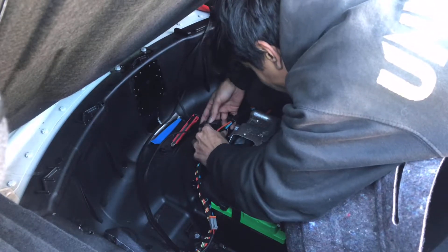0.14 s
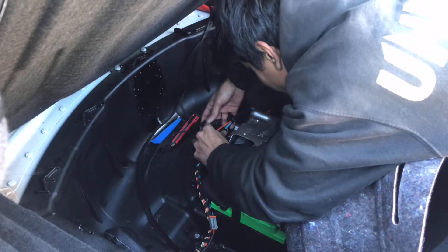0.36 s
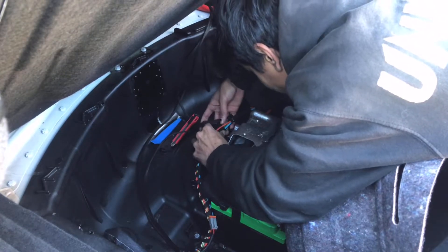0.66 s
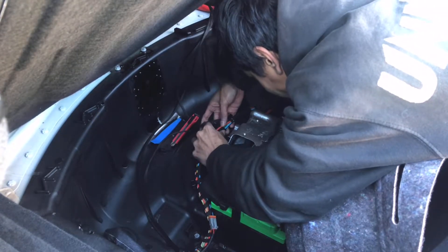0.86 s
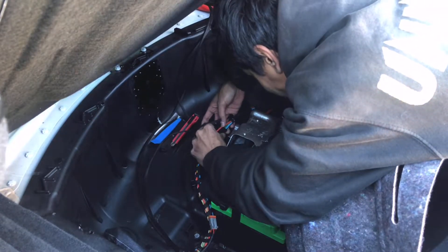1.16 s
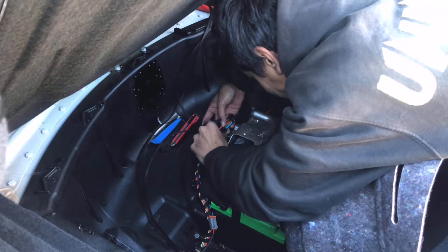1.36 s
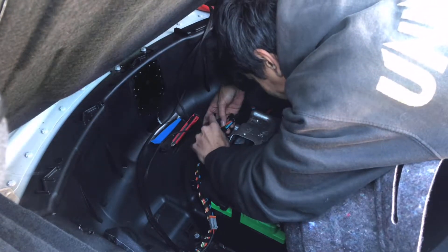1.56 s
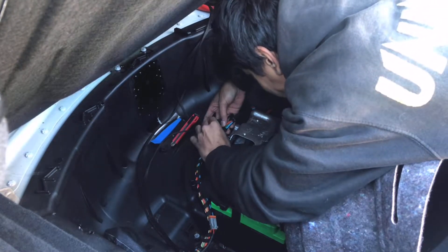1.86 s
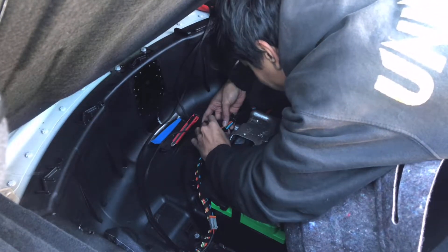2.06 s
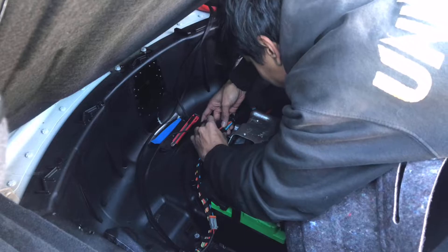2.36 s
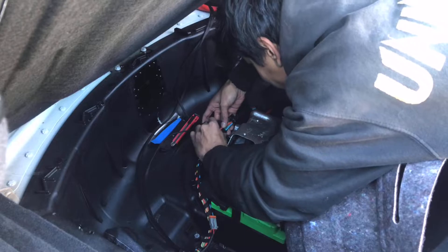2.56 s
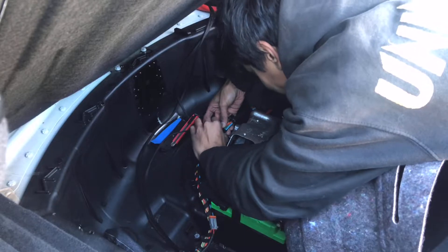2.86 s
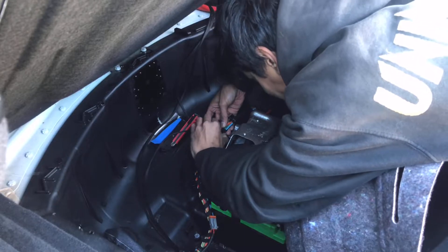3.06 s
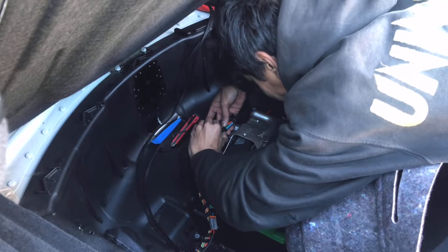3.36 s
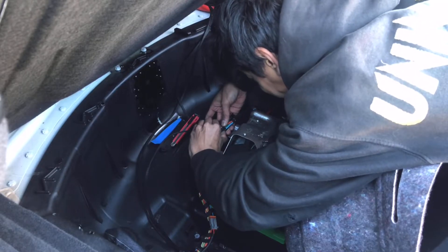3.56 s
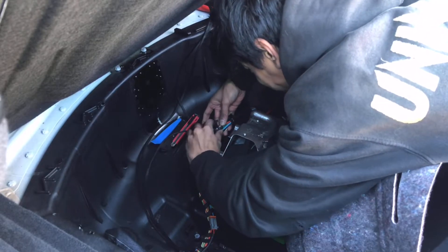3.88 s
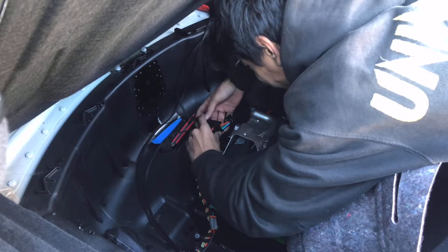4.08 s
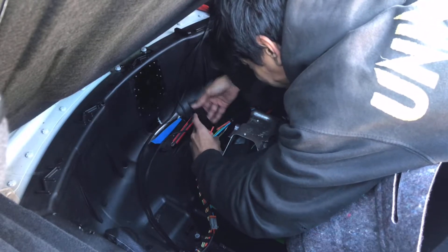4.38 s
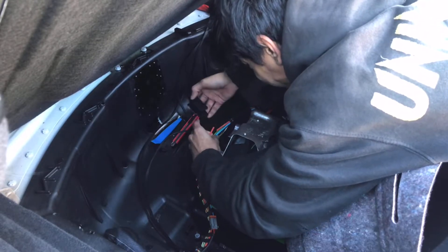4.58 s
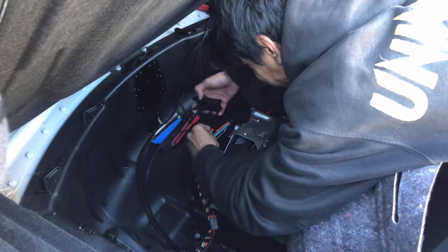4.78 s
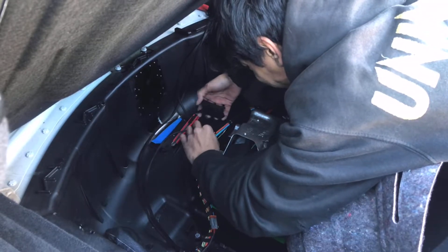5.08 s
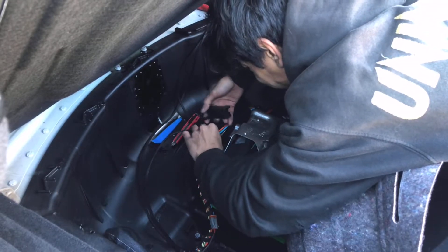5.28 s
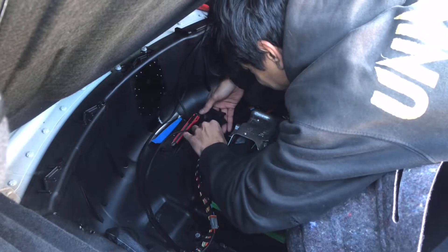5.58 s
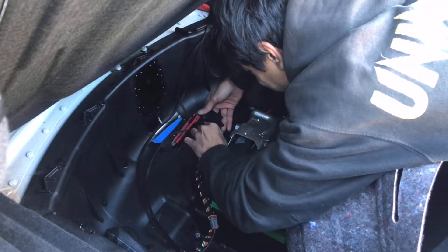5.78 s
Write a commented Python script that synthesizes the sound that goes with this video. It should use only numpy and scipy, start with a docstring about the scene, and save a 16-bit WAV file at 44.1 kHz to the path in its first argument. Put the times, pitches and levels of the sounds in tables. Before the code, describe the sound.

The first seconds are mostly outdoor traffic heard from an open car trunk: a vehicle already approaching swells to its nearest at about 1.1 s, a dull roar with low engine hum and faint tyre singing, its pitch sinking slightly as it fades away by around 3 s. Faint deep thumps begin at 1.4 s, with handling rumble from 2.3 s. A thin leak rises just before 3.36 s, when the cut line releases with a crisp, very short pop. Bright compressed air then hisses without stopping to the end at about 6 s. It starts strongest, narrow and sharp, eases, then grows fuller and more hollow as the grip changes, with breathy half-whistles, a sharp spit at 4.33 s and brief dips and returns around 5.1 to 5.6 s. Dull knocks and uneven rubbing cluster from 3.7 to 4.7 s and again near 5.5 s, close to the microphone.

```python
"""Outside an open car trunk, a vehicle swells and fades: roar shaped by distance, engine lines, tyre song.
Handling adds damped low thumps and a lumpy rumble at the microphone. A cut suspension line leaks,
then lets go with a pop of short noise bursts. Compressed air hisses out as turbulent noise that changes
colour with the grip, half whistling in narrow resonances as fingers work the tube."""
import sys
import numpy as np
from scipy import signal
from scipy.fft import rfft, irfft
from scipy.io import wavfile
from scipy.ndimage import uniform_filter1d

SR = 44100
rng = np.random.default_rng(int(sys.argv[2]) if len(sys.argv) > 2 else 0)


def bounce(signal):
    """Save signal as a 16-bit WAV file at the path given by the first command-line argument."""
    frames = np.transpose(np.atleast_2d(signal))
    limited = np.clip(frames, -1, 1)
    pcm = np.round(limited * 32767).astype(np.int16)
    wavfile.write(sys.argv[1], SR, pcm)


N = 261513
TIME = np.arange(N) / SR
BIN_HZ = np.fft.rfftfreq(1024, 1 / SR)
FRAME_S = np.arange(N // 256 + 5) * 256 / SR

# Vehicle roar, relative spectrum at its nearest: frequency_hz, density_db (per Hz)
ROAR_SPECTRUM = [(15, -35), (25, 0.5), (53, -1.5), (108, -9), (130, -8.5), (200, 2.5), (277, -8.5),
                 (394, -2.5), (476, -10.5), (607, -5.5), (1160, -10.5), (1440, -14.5), (4490, -24),
                 (11000, -37), (16000, -57)]
# Dull street background, relative spectrum: frequency_hz, density_db (per Hz)
STREET_SPECTRUM = [(30, -8), (110, -10), (300, -5.5), (700, -4.5), (1300, -4), (2000, -3.5), (2800, -16),
                   (5000, -19), (7500, -30.5), (11000, -40), (14000, -70)]
# Tyres singing as the vehicle comes and goes: start_s, end_s, pitch_hz, width_hz, level_db
TYRE_SONG = [(-.2, 0.87, 1923, 70, -48.5), (-.2, 1.2, 1800, 300, -50.5), (-.2, 0.82, 2130, 200, -53.5),
             (-.2, .55, 1070, 170, -61), (1.3, 2.2, 1900, 160, -55), (1.2, 3.6, 1150, 380, -49)]
# Engine lines, each reaching the trunk best from its own angle:
# pitch_hz (at the nearest point), level_db, loudest_s, lasting_s (to 1/e on either side)
ENGINE_LINES = [(64.6, -42, 0.82, 1.3), (105.9, -40.5, 0.78, 1.9), (210, -37.5, 1.78, 0.51),
                (242, -40, 0.93, 0.24), (320.2, -41, 1.13, 0.97), (398, -42.5, 1.47, 0.96),
                (576, -49, 1.27, 1.3), (670, -46.5, 0.82, 0.88), (1070, -47.5, 1.44, 0.28)]
NEAREST_S = 1.082  # when the vehicle is nearest
PASS_S = 1.203  # time it takes to travel as far as its nearest distance
FALL_DB = 60  # treble loss per tenfold distance
# from this time on, while the vehicle is still approaching, the treble tilt grows (dB per octave each second)
DULL_FROM_S, DULL_DB_PER_S = 0.59, 1.2
DOPPLER_SHARE = 0.035  # vehicle speed over the speed of sound

# Handling thumps: start_s, peak_db (before a common trim), pitch_hz, t60_s
THUMPS = [(1.385, -27.5, 42, 0.3), (1.933, -27, 47.5, 0.15), (2.381, -17, 53, 0.067),
          (2.66, -29.5, 170, 0.092), (2.991, -20.5, 76, 0.036), (3.3603, -15.5, 388, 0.01),
          (3.363, -18, 71.5, 0.071), (3.732, -31.5, 315, 0.028), (3.779, -15.5, 62, 0.1),
          (3.83, -26, 278.4, 0.023), (3.84, -16.5, 41, 0.2), (3.936, -21.5, 147, 0.048),
          (3.995, -26, 146, 0.067), (4.178, -28.5, 322, 0.033), (4.258, -15.5, 247.6, 0.019),
          (4.26, -22.5, 627, 0.011), (4.336, -14, 300, 0.014), (4.343, -14, 57.6, 0.072),
          (4.403, -21, 250, .03), (4.448, -24.5, 260, 0.032), (4.585, -26, 167, 0.039),
          (4.732, -29, 222, 0.036), (4.966, -19, 56, 0.056), (5.015, -30.5, 166, 0.04),
          (5.474, -17.5, 185, 0.028), (5.553, -27.5, 248, 0.035), (5.601, -15.5, 42, 0.095)]
# Bouts of handling: start_s, end_s, rumble_db, rub_db (each before a common trim)
HANDLING = [(2.325, 3.38, -34.5, -60), (3.726, 3.88, -23.5, -42), (3.967, 4.72, -29.5, -45.5),
            (4.196, 4.42, -28, -32.5), (4.916, 5.95, -33, -58), (5.406, 5.68, -31.5, -43.5)]
# Handling noise, relative spectrum: frequency_hz, density_db (per Hz)
RUMBLE_SPECTRUM = [(12, -36), (20, -14.5), (38, 5.5), (60, -0.5), (108, -6), (144, -8), (183, -12.5),
                   (268, -19.5), (381, -23), (500, -23.5), (620, -31.5), (900, -41.5), (1170, -62),
                   (1980, -120)]
PRESS_S = 0.032  # build-up of a bout
SETTLE_DB_PER_S, RUB_STOP_DB_PER_S = 96, 260  # the rub stops sooner than the rumble

# Sharp spurts and ticks at the tube: start_s, level_db, length_s (to 1/e), centre_hz, spread_octaves
SPURTS = [(2.9423, -59, 0.0021, 10600, 0.5), (3.3575, -20, 0.0016, 2500, 0.9),
          (3.3585, -9, 0.0025, 9500, 0.22), (3.3597, -11.5, 0.0029, 4200, 1.2),
          (3.426, -32, 0.0043, 1500, 0.21), (4.3302, -19, 0.0077, 7000, 1.23),
          (4.331, -21.5, 0.0063, 5550, 0.034)]
# Air seeping out before the line lets go: time_s, level_db
LEAK_LEVEL = [(3.26, -75), (3.29, -55), (3.355, -40)]
# Leaking air, relative spectrum: frequency_hz, density_db (per Hz)
LEAK_SPECTRUM = [(1500, -28), (3500, -16), (6500, -7), (7200, -7), (7570, 5), (7950, -11), (11500, -18),
                 (12500, -26), (16000, -43)]
RELEASE_S = 3.359  # when the line lets go

# Jet through a narrow slit, relative spectrum: frequency_hz, density_db (per Hz)
SLIT_SPECTRUM = [(530, -62), (900, -37), (1040, -36), (1130, -18), (1510, -21), (1680, -14.5), (1850, -21),
                 (2040, -17), (3040, -6.5), (4920, -7.5), (5750, -1.5), (7060, 0.5), (8250, -9),
                 (11600, -5), (16000, -24)]
# Jet with the cut gaping, relative spectrum: frequency_hz, density_db (per Hz)
OPEN_SPECTRUM = [(530, -25), (900, -22), (1170, -15), (1320, -25), (1390, -21.5), (1790, -18.5),
                 (1920, -18), (2660, -2.5), (3550, -8.5), (3820, -10), (5410, 0), (6720, -0.5), (8660, 0.5),
                 (11700, -4), (16000, -21)]
# Jet with a hand cupped round it, relative spectrum: frequency_hz, density_db (per Hz)
CUPPED_SPECTRUM = [(530, -31), (900, -26), (1040, -20), (1250, -42), (1370, -18), (1660, -25), (2040, -2),
                   (2250, -13.5), (2660, -7.5), (4360, -8), (5610, 1), (6640, -1), (9090, 1), (13200, -6),
                   (16000, -24)]
# Shape of the cut: time_s, grip (0 slit, 1 gaping, 2 cupped; no unit)
GRIP = [(4.1, 0.12), (4.45, 0.86), (5.3, 1.38), (5.48, 1.45), (5.7, 1.73)]
# Jet strength as fingers cover and free the cut: time_s, hiss_db (before a common trim)
FLOW = [(3.385, -27), (3.771, -31.5), (4.225, -30), (4.31, -33), (4.36, -33), (4.412, -33.5),
        (4.672, -32.5), (4.716, -29.5), (5.072, -28), (5.12, -32.5), (5.168, -28), (5.306, -35),
        (5.41, -34.5), (5.428, -31.5), (5.588, -29.5), (5.636, -32.5), (5.92, -31)]
# One row each for slit, gaping and cupped, against the hiss: hollow_db (low part),
# sizzle_db (top, at the usual flow)
BALANCES = [(-9.5, -4.5), (-3, 1.7), (0.5, -2.5)]
# Peaks and notches of the wheel well round the jet (a cupped hand deepens them):
# centre_hz, width_hz (two standard deviations), gain_db
WHEEL_WELL = [(2400, 200, -0.5), (3600, 130, 2.5), (4130, 480, -1.5), (4550, 180, 2), (6660, 420, -3),
              (7160, 140, -3.5), (7790, 450, -3), (8600, 200, 3), (10100, 200, -1), (11520, 220, 4),
              (12450, 250, 0), (13900, 300, 3)]
USUAL_FLOW_DB, SIZZLE_FOLLOWS = -30, 0.64  # the top sizzle follows the flow only in part

# Half whistles where a fingertip splits the jet: start_s, length_s, pitch_hz, level_db (before a common trim)
WHISTLES = [(3.7, .18, 9000, -39), (3.88, 0.14, 6300, -37), (3.99, 0.33, 5620, -35),
            (4.15, .16, 12000, -43), (4.329, 0.69, 10270, -40.5), (4.69, 0.089, 9500, -33),
            (4.4, 0.82, 2760, -40.5), (4.86, 0.33, 4400, -39), (4.967, 0.27, 9900, -34.5),
            (5.203, .3, 10100, -35.5), (5.399, 0.15, 9700, -33), (5.53, 0.12, 10200, -31.5),
            (5.432, 0.31, 3450, -37.5), (5.42, .58, 2600, -42), (5.801, 0.19, 9300, -34)]
WHISTLE_WIDTH_HZ = 190
SKIRT_FROM_HZ, SKIRT_OCTAVES, SKIRT_DB = 7500, 0.47, -0.5  # broad sizzle round the high whistles only
EDGE_HZ = 15800  # upper band limit


def gain_of(db):
    """Logarithmic level: decibels become an amplitude factor."""
    return 10 ** (np.asarray(db) / 20)


def evened(x):
    """Normalisation by mean power: the rms becomes 1."""
    return x / np.sqrt(np.mean(x ** 2) + 1e-20)


def read(points, hz):
    """Spectral interpolation: dB along a log-frequency axis."""
    f, db = np.transpose(points)
    return np.interp(np.log(hz + 1), np.log(f + 1), db)


def follow(rows, t):
    """Linear interpolation of each column of a time curve at the times t."""
    s, *columns = np.transpose(rows)
    return [np.interp(t, s, c) for c in columns]


def add(mix, s, sound):
    """Superposition at time s of a sound that may already be under way at time zero."""
    start = round(s * SR)
    sound = sound[max(-start, 0):]
    part = mix[max(start, 0):][:len(sound)]
    part += sound[:len(part)]


def above(hz, corner_hz, order=8):
    """Crossover: the share of power passed above the corner."""
    return 1 / (1 + (corner_hz / (hz + 1)) ** order)


def noise(shape):
    """Filtered noise: steady, of rms 1, with the gain shape(Hz)."""
    spectrum = rfft(rng.standard_normal(N))
    return evened(irfft(spectrum * shape(np.fft.rfftfreq(N, 1 / SR)), N))


def moving_noise(power):
    """Short-time synthesis: noise of given power in each frame and bin."""
    z = rng.standard_normal(power.shape) + 1j * rng.standard_normal(power.shape)
    x = signal.istft((z * np.sqrt(power)).T, nperseg=1024, noverlap=768)[1][:N]
    return x * np.sqrt(3 / 2)  # makes up for overlapping independent frames


def band_power(power, lo_hz, hi_hz):
    """Band integration: the power of each frame between two frequencies."""
    band = above(BIN_HZ, lo_hz, order=30) * (1 - above(BIN_HZ, hi_hz, order=30))
    return (power * band).sum(1, keepdims=True)


def patches(size):
    """Local averaging: a random field of rms 1, smoothed over size (frames, bins)."""
    field = rng.standard_normal((len(FRAME_S), len(BIN_HZ)))
    over_time = uniform_filter1d(field, size[0], axis=0)
    return evened(uniform_filter1d(over_time, size[1], axis=1))


def fuzzy_tones(rows):
    """Resonance: noise in narrow bands that swell and sink back."""
    out = np.zeros(N)
    for start, end, hz, width_hz, db in rows:
        size = max(round((end - start) * SR), 512)
        # half amplitude at 0.69 of the width on either side
        off = (np.fft.rfftfreq(size, 1 / SR) - hz) / (0.69 * width_hz)
        tone = evened(irfft(rfft(rng.standard_normal(N)[:size]) / (1 + off ** 2), size))
        add(out, start, gain_of(db) * tone * signal.windows.tukey(size, 0.5))
    return out


def traffic(patchy_db=2.0, bass_share=0.15, near_db=-33.5, street_db=-50):
    """Distance loss: a roar over the street and tyre song, its treble falling most and its bass least."""
    t = FRAME_S[:, None]
    distance_db = -FALL_DB * np.log10(np.hypot(1, (t - NEAREST_S) / PASS_S))
    tilt_db = -DULL_DB_PER_S * np.maximum(t - DULL_FROM_S, 0)
    octaves = np.log2(1 + BIN_HZ / 1800)
    reach = bass_share + (1 - bass_share) * above(BIN_HZ, 133, order=4)  # share of the loss per bin
    field_db = near_db + reach * distance_db + tilt_db * octaves + patchy_db * patches(size=(40, 3))
    power = gain_of(read(ROAR_SPECTRUM, BIN_HZ))[None] ** 2
    roar = moving_noise(power / band_power(power, 197, 2400) * gain_of(field_db) ** 2)
    street = gain_of(street_db) * noise(lambda f: gain_of(read(STREET_SPECTRUM, f)))
    return roar + street + fuzzy_tones(TYRE_SONG)


def engine(throb_db=1.5):
    """Doppler effect: wavering engine lines sink in pitch as the vehicle goes by."""
    since = TIME - NEAREST_S
    pitch = 1 - DOPPLER_SHARE * since / np.hypot(since, PASS_S)
    out = np.zeros(N)
    for hz, db, loudest, lasting in ENGINE_LINES:
        drift = noise(lambda f: 1 - above(f, 7.5))
        turns = np.cumsum(hz * pitch * (1 + 0.004 * drift)) / SR
        swell = np.exp(-((TIME - loudest) / lasting) ** 4)
        throb = gain_of(db + throb_db * drift[::-1])  # the reversed drift wavers the level
        out += swell * throb * np.sin(2 * np.pi * turns)
    return out


def thumps(thump_db=1):
    """Damped oscillation: each knock is a soft push that swings and dies away."""
    out, t = np.zeros(N), np.arange(SR // 2) / SR
    for s, db, hz, t60 in THUMPS:
        push = 1 - np.exp(-t * hz / 0.2)
        swing = np.sin(2 * np.pi * hz * t) * push * gain_of(-60 * t / t60)
        add(out, s, -gain_of(db + thump_db) * swing / abs(swing).max())
    return out


def bout(start, end, fall_db_per_s):
    """Envelope of one handling bout: linear growth, a hold, then exponential decay."""
    return np.clip((TIME - start) / PRESS_S, 0, 1) * gain_of(-fall_db_per_s * np.maximum(TIME - end, 0))


def rumble(rumble_db=-1, rub_db=-1, lumpy_db=3):
    """Frictional noise: deep handling rumble, with an uneven rub on top when the grip slips."""
    weight = sum(gain_of(db) * bout(start, end, SETTLE_DB_PER_S) for start, end, db, _ in HANDLING)
    slip = sum(gain_of(db) * bout(start, end, RUB_STOP_DB_PER_S) for start, end, _, db in HANDLING)
    deep = noise(lambda f: gain_of(read(RUMBLE_SPECTRUM, f)) * np.sqrt(1 - above(f, 146)))
    # level out chance swells, so that the hands set them
    deep = deep / np.sqrt(uniform_filter1d(deep ** 2, size=2500) + 0.023)
    rub = noise(lambda f: gain_of(read(RUMBLE_SPECTRUM, f)) * np.sqrt(above(f, 130)))
    lumps = noise(lambda f: 1 - above(f, 50))
    rub = evened(rub * gain_of(lumpy_db * lumps))
    return gain_of(rumble_db) * weight * deep + gain_of(rub_db) * slip * rub


def spurts(tail_db=-20, tail_t60=0.099, top_hz=12000, rise_s=0.00025):
    """Impulsive release: milliseconds of air at full pressure, then the short ring of the trunk."""
    out, t = np.zeros(N), np.arange(8192) / SR
    f = np.fft.rfftfreq(len(t), 1 / SR) + 1
    for s, db, length, hz, spread in SPURTS:
        band = np.exp(-0.5 * (np.log2(f / hz) / spread) ** 2)
        colour = band * np.sqrt(1 - above(f, top_hz, order=20))
        air = evened(irfft(rfft(rng.standard_normal(len(t))) * colour))
        ring = gain_of(tail_db - 60 * t / tail_t60)
        shape = (1 - np.exp(-t / rise_s)) * (np.exp(-(t / length) ** 4) + ring)
        add(out, s, gain_of(db) * air * shape)
    return out


def leak():
    """Flow noise through a small gap: a thin whistling hiss grows as the seal gives."""
    level_db, = follow(LEAK_LEVEL, TIME)
    hiss = noise(lambda f: gain_of(read(LEAK_SPECTRUM, f)))
    return (TIME > LEAK_LEVEL[0][0]) * gain_of(level_db) * hiss


def jet(patchy_db=2.03, sputter_db=0.55, jet_db=-0.74, breadth_db=-24, cupping=0.44):
    """Turbulence: jet noise coloured by the cut and rippled by reflections from hands and trunk."""
    level_db, = follow(FLOW, FRAME_S[:, None])
    grip = np.clip(follow(GRIP, FRAME_S[:, None])[0], 0, 2)
    hollow_db, sizzle_db = (np.interp(grip, range(len(BALANCES)), c) for c in np.transpose(BALANCES))
    sizzle_db = sizzle_db - (1 - SIZZLE_FOLLOWS) * (level_db - USUAL_FLOW_DB)

    # crossfade between neighbouring grips
    spectra = [SLIT_SPECTRUM, OPEN_SPECTRUM, CUPPED_SPECTRUM]
    colour_db = sum(np.maximum(1 - abs(grip - k), 0) * read(c, BIN_HZ) for k, c in enumerate(spectra))
    well_db = sum(db * np.exp(-(2 * (BIN_HZ - hz) / width) ** 2 / 2) for hz, width, db in WHEEL_WELL)
    well_db = well_db * (1 + cupping * np.maximum(grip - 1, 0))  # a cupped hand deepens the resonances
    breadth = gain_of(breadth_db) ** 2 * (1 - above(BIN_HZ, 940, order=4))
    power = gain_of(colour_db + well_db) ** 2 + breadth

    # set the balance of three bands, which shifts with grip and flow
    low, top = 1 - above(BIN_HZ, 4170, order=16), above(BIN_HZ, 8000, order=24)
    hollow = low * gain_of(hollow_db) ** 2 / band_power(power, 1700, 4520)
    hiss = (1 - low) * (1 - top) / band_power(power, 4400, 7700)
    sizzle = top * gain_of(sizzle_db) ** 2 / band_power(power, 7300, 16000)
    power = power * (hollow + hiss + sizzle)

    ripple_db = 1.4 * patches(size=(60, 3))
    texture_db = ripple_db + patchy_db * patches(size=(12, 7))
    sputter = noise(lambda f: 1 - above(f, 70, order=2))
    air = moving_noise(power * gain_of(level_db + jet_db + texture_db) ** 2)
    return air * gain_of(sputter_db * sputter)


def whistles():
    """Edge tones as narrow resonances; the high ones sit in a broad skirt of sizzle."""
    cores = [(s, s + length, hz, WHISTLE_WIDTH_HZ, db) for s, length, hz, db in WHISTLES]
    skirts = [(start, end, hz, hz * (2 ** SKIRT_OCTAVES - 1), db + SKIRT_DB)
              for start, end, hz, _, db in cores if hz > SKIRT_FROM_HZ]
    return fuzzy_tones(cores + skirts)


def scene(whistle_db=-1):
    """Superposition at one microphone: the leak turns into the full jet within 1.9 ms."""
    flowing = np.clip((TIME - RELEASE_S) / 0.0019, 0, 1)
    full_jet = jet() + gain_of(whistle_db) * whistles()
    air = (1 - flowing) * leak() + flowing * full_jet + spurts()
    mono = traffic() + engine() + thumps() + rumble() + air
    return np.array([mono, mono])


def record(dry):
    """Transducer limits: the deepest bass is shed, loud peaks are rounded, then the band is limited."""
    thinned = signal.sosfilt(signal.butter(2, 22, "high", fs=SR, output="sos"), dry)
    rounded = thinned / (1 + (thinned / 0.8) ** 6) ** (1 / 6)
    band_limit = signal.firwin(511, EDGE_HZ, window=("kaiser", 9), fs=SR)
    return signal.oaconvolve(rounded, band_limit[None], "same")


dry = scene()
out = record(dry)
bounce(out)
```